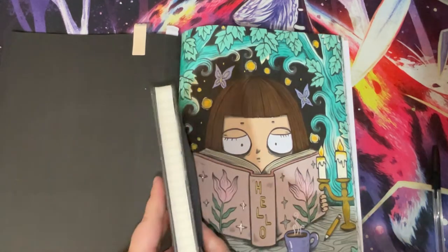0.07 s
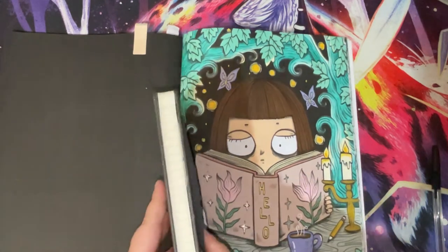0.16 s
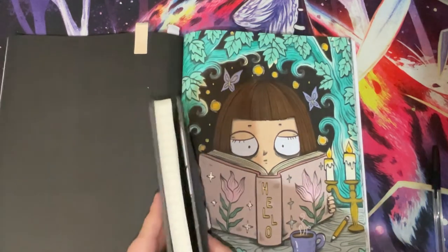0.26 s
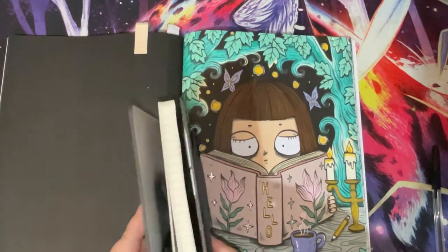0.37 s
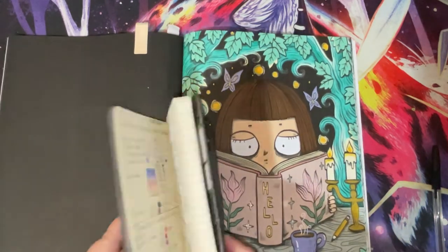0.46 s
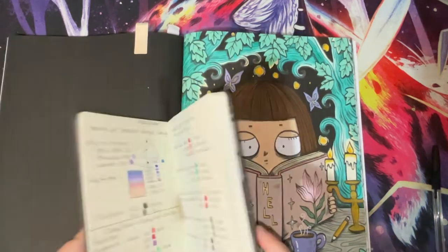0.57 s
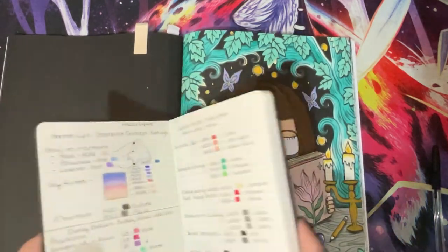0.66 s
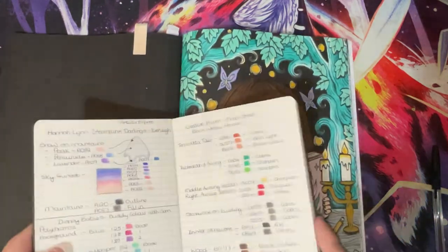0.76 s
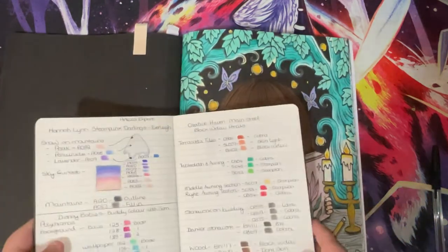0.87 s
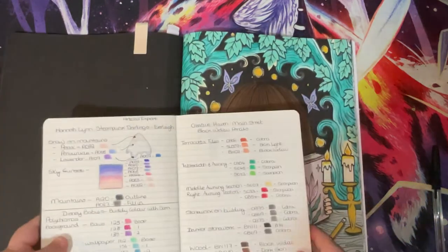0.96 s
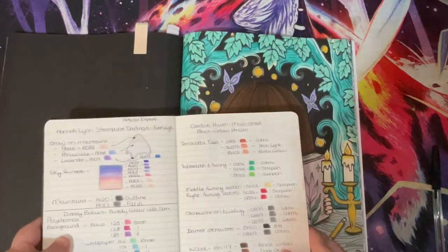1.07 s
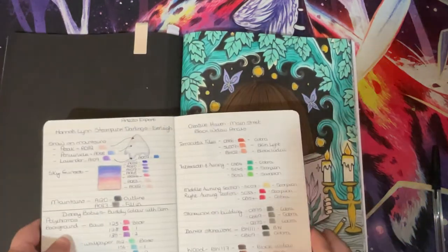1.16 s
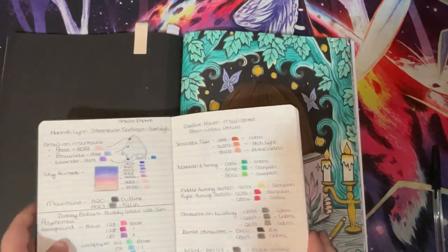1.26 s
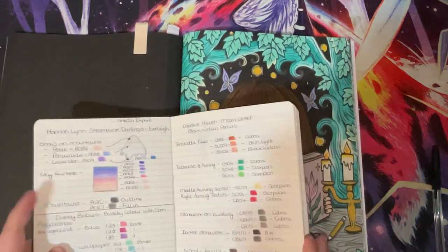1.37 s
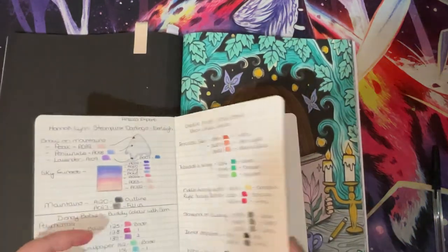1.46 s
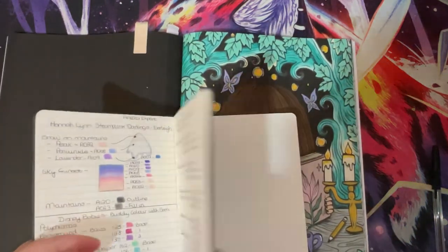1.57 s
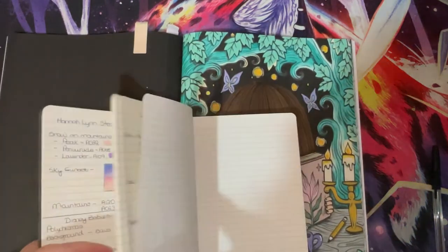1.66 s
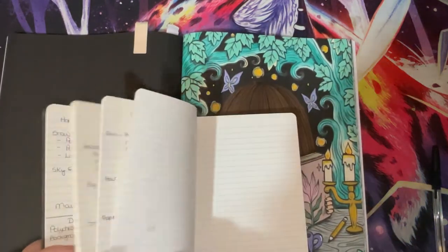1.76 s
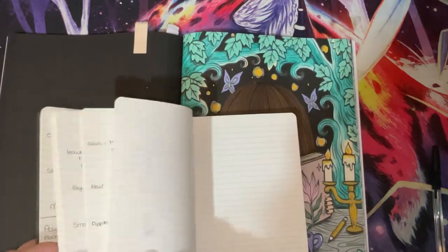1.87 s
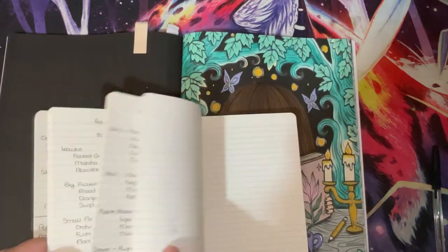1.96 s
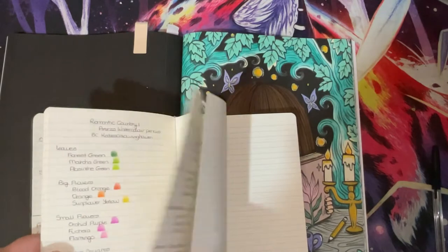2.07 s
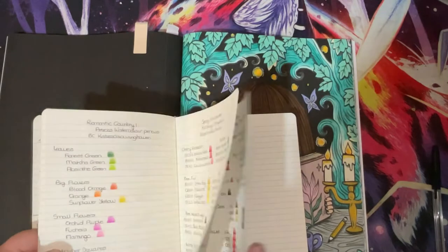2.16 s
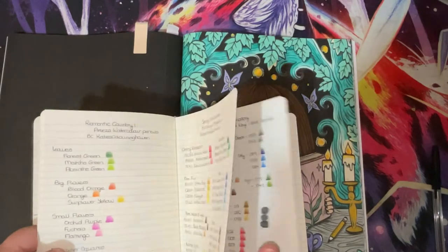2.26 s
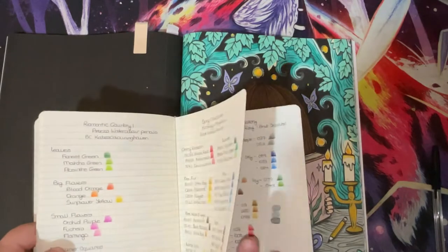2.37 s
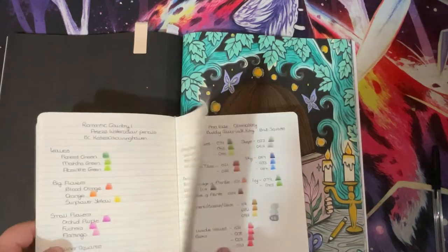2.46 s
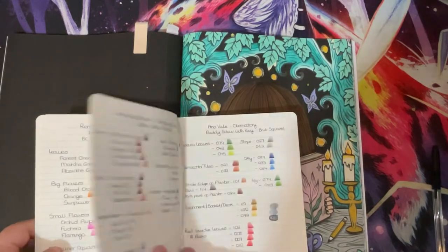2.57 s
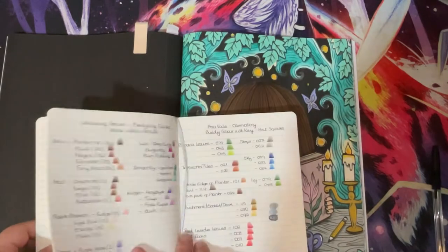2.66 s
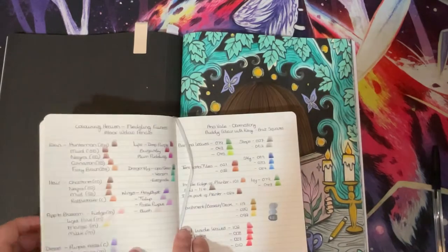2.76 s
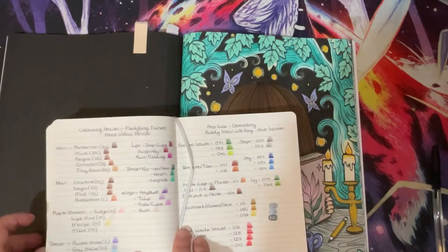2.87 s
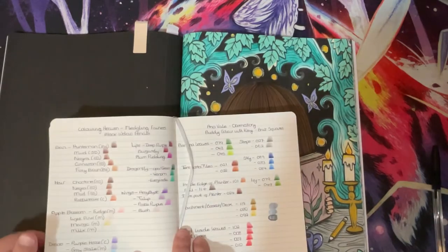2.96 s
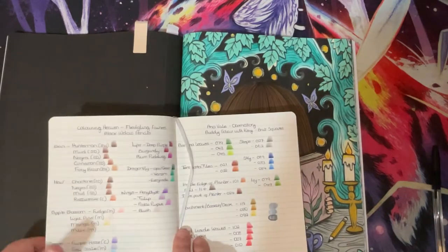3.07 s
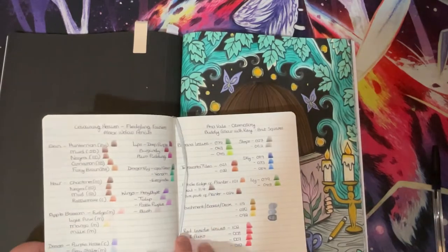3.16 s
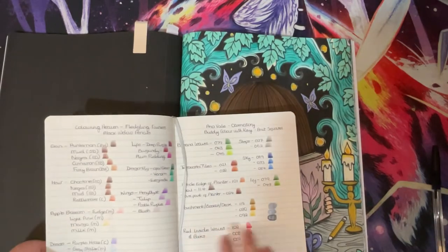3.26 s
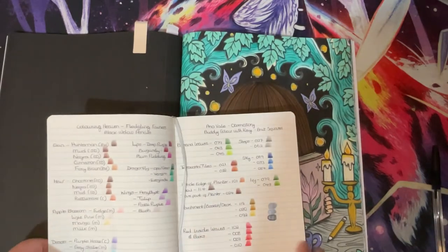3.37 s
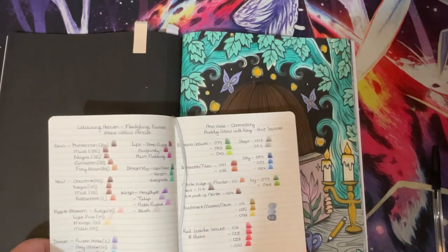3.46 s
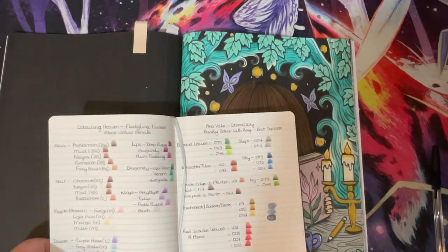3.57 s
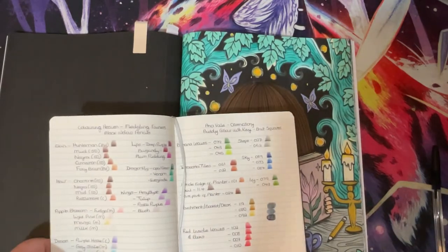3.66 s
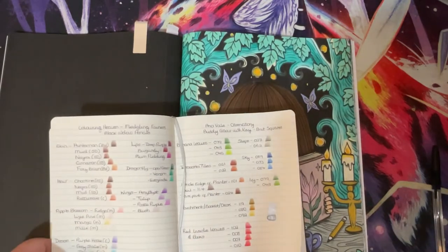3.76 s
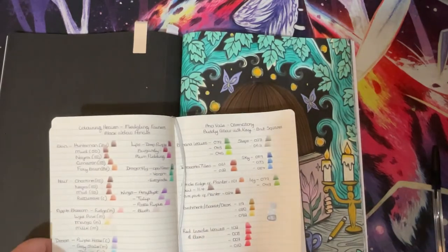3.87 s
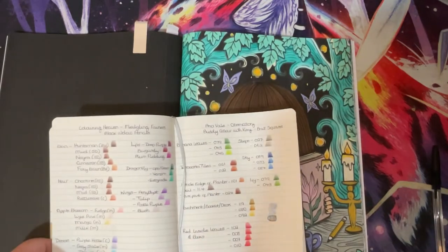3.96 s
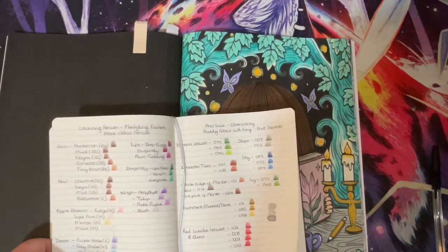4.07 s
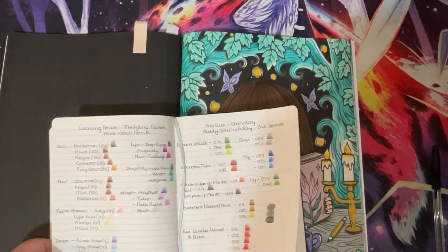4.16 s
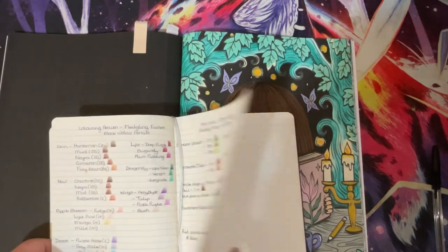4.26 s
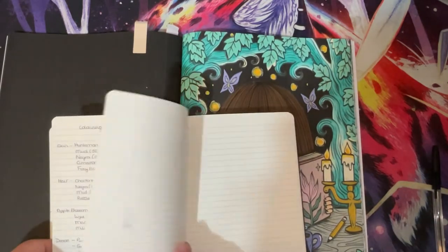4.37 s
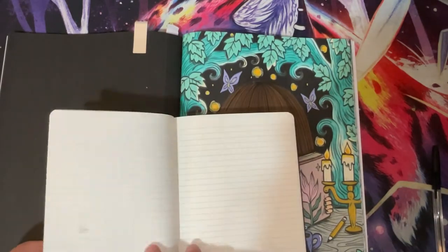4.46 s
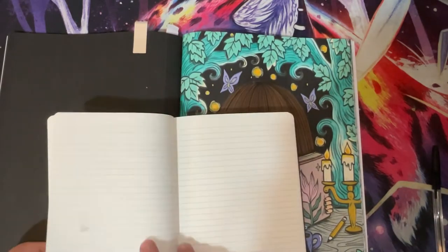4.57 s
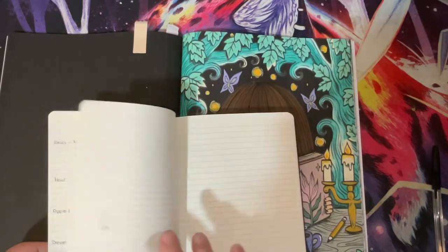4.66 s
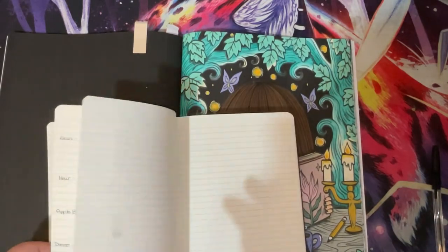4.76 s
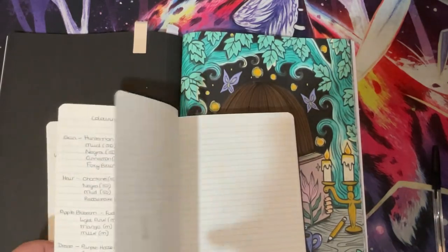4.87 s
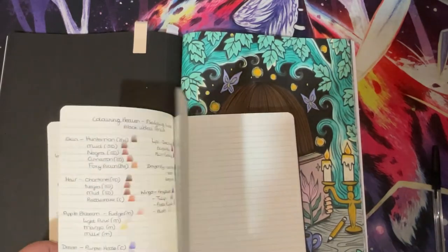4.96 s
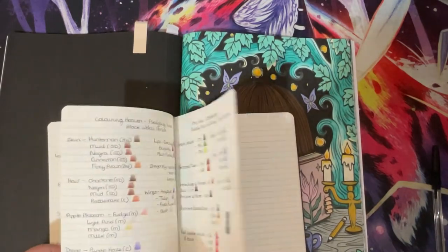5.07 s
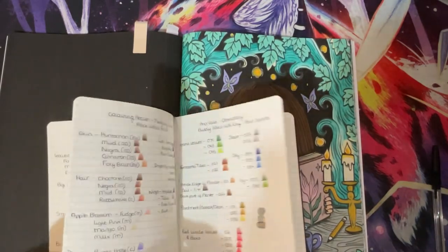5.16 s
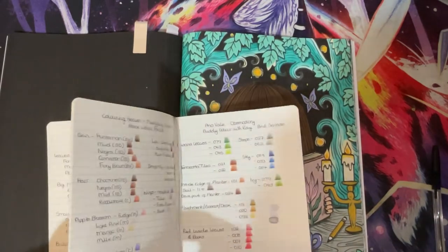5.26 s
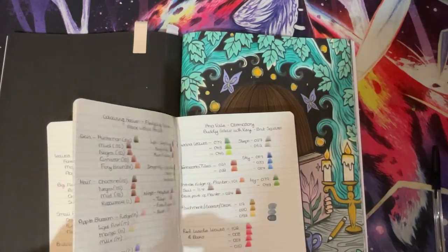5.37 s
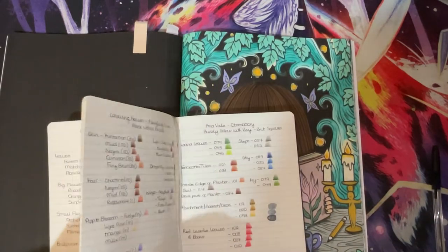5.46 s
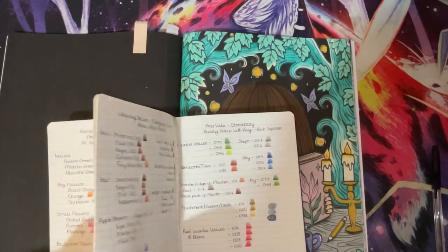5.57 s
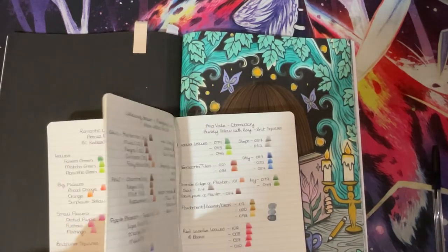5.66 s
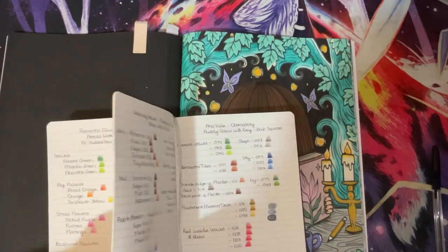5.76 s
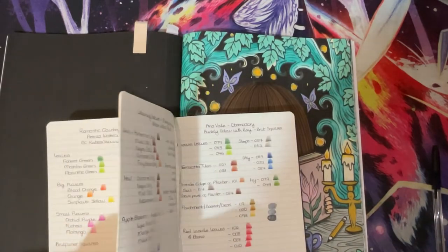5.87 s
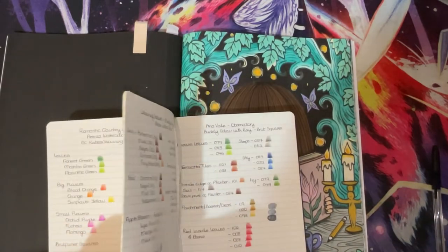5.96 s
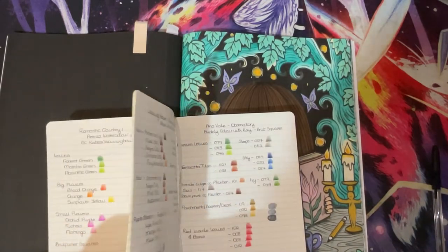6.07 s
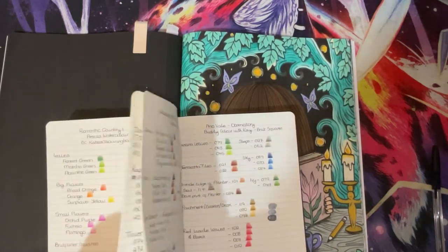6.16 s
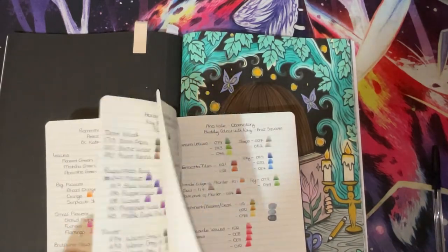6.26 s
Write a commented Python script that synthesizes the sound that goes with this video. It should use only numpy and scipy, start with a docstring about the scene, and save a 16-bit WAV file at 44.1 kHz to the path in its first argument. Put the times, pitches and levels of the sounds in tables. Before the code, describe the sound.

Close to a stereo microphone in a quiet, humming room, a small notebook opens with a burst of sharp dry snaps and spine crackle. Its cover lands with one dull thud on the desk, then pages slide and flap over. After a near-still pause, fingertips tap and swipe, more sheets flip with hollow puffs, and lighter leafing ends in a swelling hiss.

```python
"""At a desk in a quiet room, a small notebook is opened and leafed through close to two microphone ports.
Sliding sheets hiss by stick-slip friction, creases and the spine snap by buckling and fracture,
and flapping sheets, soft knocks and one thud of the cover are impacts that ring the book or the desk.
Ventilation drones throughout: a steady hum with noise shaped by resonances."""
import sys
import numpy as np
from scipy import signal
from scipy.fft import rfft, irfft, next_fast_len
from scipy.io import wavfile
from scipy.ndimage import uniform_filter1d, map_coordinates

SR = 44100
rng = np.random.default_rng(int(sys.argv[2]) if len(sys.argv) > 2 else 0)


def log_audio(samples):
    """Write samples as a 16-bit WAV file to the path given in sys.argv[1]."""
    # one column per channel
    frames = np.atleast_2d(samples).T
    # limit to full scale, then quantise
    limited = np.clip(frames, -1, 1)
    pcm = np.round(limited * 32767).astype(np.int16)
    wavfile.write(sys.argv[1], SR, pcm)


N = 277809


def amp(db):
    """Decibels to amplitude ratio."""
    return 10 ** (np.asarray(db) / 20)


def unit(x):
    """Normalisation to rms 1."""
    return x / np.sqrt(np.mean(x ** 2) + 1e-20)


def along(points, hz):
    """Interpolation of (Hz, value) points on a logarithmic frequency axis."""
    f, v = np.transpose(points)
    return np.interp(np.log(hz + 1), np.log(f + 1), v)


def filtered(x, response):
    """Linear filtering: the spectrum of x times a complex response of frequency."""
    n = x.shape[-1]
    m = next_fast_len(n + 8192)
    return irfft(rfft(x, m) * response(np.fft.rfftfreq(m, 1 / SR)), m)[..., :n]


def coloured(x, spectrum):
    """Spectral shaping of x, returned at rms 1."""
    return unit(filtered(x, lambda hz: amp(along(spectrum, hz))))


def resonance(hz, centre, width):
    """Damped oscillator: the causal response of one mode."""
    return 1j * hz * width / (centre ** 2 - hz ** 2 + 1j * hz * width)


def decay(t, t60):
    """Exponential decay: a fall of 60 dB in t60 seconds."""
    return np.exp(-np.log(1000) * t / t60)


def wobble(rate):
    """Slow random modulation: a smooth curve with rate knots a second."""
    knots = rng.standard_normal(int(N * rate / SR) + 4)
    return map_coordinates(knots, [np.arange(N) * rate / SR])


def swells(rows):
    """Superposition of bell-shaped level curves."""
    t = np.arange(N) / SR
    return sum(amp(db) * np.exp(-((t - s) / length) ** 2) for s, db, length in rows)


def add(track, s, sound):
    """Superposition: mixes a sound in at time s."""
    part = track[round(s * SR):][:len(sound)]
    part += sound[:len(part)]


# spectrum of the air rush: pitch_hz, level_db
AIR_SPECTRUM = [(20, -59), (35, -27.5), (60, -11), (90, -6.5), (150, 2), (280, -1.5), (420, -10),
                (600, -7.5), (800, -18), (1300, -19.5), (2600, -32.5), (6000, -39.5), (9800, -58.5),
                (12500, -42.5), (16000, -45)]
# droning room resonances: pitch_hz, width_hz (of each of two passes), level_db (rms)
DRONE_MODES = [(63.3, 16, -64.5), (119.4, 31, -63.5), (151.4, 38.5, -59.5), (247.3, 32.7, -59),
               (303.7, 14, -68), (547.2, 16, -68)]


def ventilation(air_db=-59, side_db=-16, hum_hz=60, hum_db=-62.5, drift=0.2):
    """Mains hum and resonance: hum, soft rush and droning modes, nearly the same at both ports."""
    mid, side = amp(air_db) * coloured(rng.standard_normal((2, N)), AIR_SPECTRUM)
    for hz, width, db in DRONE_MODES:
        drone = filtered(rng.standard_normal(N), lambda f: resonance(f, hz, width) ** 2)
        mid = mid + amp(db) * unit(drone)
    phase = 2 * np.pi * hum_hz * np.arange(N) / SR + drift * wobble(2.1)  # drift in radians
    hum = unit(np.sin(phase))
    return mid + amp(hum_db) * hum + amp(side_db) * np.array([side, -side])


GLIDE_DB, GLIDE_FIZZ_DB = 2, 0.5  # gains on the hiss and the fizz columns
GLIDE_FADE_S = 0.18  # fade at both ends of a spell
# murmur level at one hiss level (after its gain), and its dB per dB of hiss
MURMUR_DB, MURMUR_AT_DB, MURMUR_GROWS = -57.5, -54.5, 0.6
# sheets gliding over each other, one curve per spell of leafing:
# time_s, hiss_db, fizz_db (both before the gains above)
GLIDE_SPELLS = [
    [(0.0, -57, -88.5), (0.266, -62, -62.5), (0.41, -64.5, -65.5), (0.552, -59, -60.5), (0.886, -60, -65),
     (1.022, -67, -73), (1.075, -67, -88), (1.12, -80.5, -94), (1.22, -81, -95), (1.324, -87, -90),
     (1.39, -69, -95)],
    [(1.47, -64.5, -75), (1.62, -55, -69), (2.06, -56.5, -58), (2.228, -62, -62.5), (2.652, -66.5, -69),
     (2.754, -57.5, -62.5), (2.878, -67, -71), (2.96, -92, -99), (3.044, -67, -87), (3.24, -78.5, -86),
     (3.33, -86.5, -93.5)],
    [(4.03, -67, -85), (4.134, -61.5, -65), (4.3, -61.5, -71.5), (4.46, -60, -62), (4.56, -58.5, -63),
     (4.7, -68.5, -78.5), (4.78, -74.5, -86), (4.856, -74, -92), (5.15, -61.5, -69), (5.29, -69.5, -81),
     (5.37, -64, -66.5), (5.44, -70.5, -83.5), (5.5, -63.5, -62), (5.56, -69.5, -88), (5.583, -79, -95.5),
     (5.61, -70.5, -90), (5.68, -96, -92)],
    [(6.02, -78, -88), (6.066, -66, -79), (6.206, -53, -62.5), (6.244, -47.5, -61), (6.3, -47, -55)],
]


def glide():
    """Sliding friction: slow hiss, murmur and fizz levels; the harder the slide, the more murmur."""
    t, levels = np.arange(N) / SR, np.zeros((3, N))
    for spell in GLIDE_SPELLS:
        s, hiss_db, fizz_db = np.transpose(spell)
        hiss_db = np.interp(t, s, hiss_db) + GLIDE_DB
        fizz_db = np.interp(t, s, fizz_db) + GLIDE_FIZZ_DB
        murmur_db = MURMUR_DB + MURMUR_GROWS * (hiss_db - MURMUR_AT_DB)
        touching = np.clip(1 + np.minimum(t - s[0], s[-1] - t) / GLIDE_FADE_S, 0, 1)
        levels += touching * amp([hiss_db, murmur_db, fizz_db])
    return levels


def friction(spectrum, rate, share, flutter_db):
    """Stick-slip: fibres catch and let go, tiny slips on a fine rush under uneven pressure."""
    rush = rng.standard_normal(N)
    slips = (rng.random(N) < rate / SR) * rng.standard_normal(N)  # rate in slips a second
    share = np.clip(share, 0, 1)  # share of the power in the slips
    grains = np.sqrt(1 - share) * rush + np.sqrt(share) * unit(slips)
    pressure = amp(flutter_db * wobble(70))
    return unit(coloured(grains, spectrum) * pressure)


# spectrum of paper rubbing on paper: pitch_hz, level_db
HISS_SPECTRUM = [(300, -4.5), (1200, -16), (2600, 1), (3700, -1), (5000, 2), (7000, 3.5), (9500, -9),
                 (12000, -4), (15500, -34)]
# spectrum of its top treble: pitch_hz, level_db
FIZZ_SPECTRUM = [(5000, -25), (9500, -29.5), (12500, 3), (15500, -2)]
# spectrum radiated by a bent sheet: pitch_hz, level_db
SHEET_SPECTRUM = [(100, 1), (300, 3.5), (550, 3.5), (850, -0.5), (1100, 5.5), (1400, 4.5), (1700, 1),
                  (2100, -3), (2700, -0.5), (4500, -25), (12000, -46)]


def sliding(hiss, murmur, fizz):
    """Friction and radiation: rubbing paper hisses and fizzes, the bent sheet murmurs lower."""
    grip = amp(1.3 * wobble(35))
    surfaces = hiss * friction(HISS_SPECTRUM, rate=1400, share=0.074, flutter_db=1.5)
    surfaces = surfaces + fizz * friction(FIZZ_SPECTRUM, rate=820, share=0.28, flutter_db=3.5)
    return grip * surfaces + murmur * friction(SHEET_SPECTRUM, rate=380, share=0.12, flutter_db=3.0)


def flexing(x, patchy_db=1.3):
    """Varying resonance: a sheet keeps changing its curve, so bands of its sound come and go."""
    z = signal.stft(x, nperseg=512)[2]
    over_pitch = uniform_filter1d(rng.standard_normal(z.shape), size=7, axis=0)
    field = uniform_filter1d(over_pitch, size=12, axis=1)
    return signal.istft(z * amp(patchy_db * unit(field)), nperseg=512)[1][:N]


def ticks(spectrum, rate):
    """Random impulses: scattered tiny contacts of random size, rate a second, at rms 1."""
    return coloured((rng.random(N) < rate / SR) * (rng.random(N) - .5), spectrum)


# spectrum of crisp paper contacts, also the scuff of flaps and taps: pitch_hz, level_db
CRISP_SPECTRUM = [(400, -15), (2000, 11), (5500, 2.5), (9000, 3), (15500, -9.5)]


def crinkles(hiss, murmur, crisp_db=-9, soft_db=-7):
    """Impulsive emission: a moving sheet ticks and pats, stronger while it slides hard."""
    crisp = amp(crisp_db) * hiss * ticks(CRISP_SPECTRUM, rate=70)
    soft = amp(soft_db) * murmur * ticks(SHEET_SPECTRUM, rate=45)
    return crisp + soft


# ringing modes of the block of pages: pitch_hz (before detuning), width_hz, level_db
BOOK_MODES = [(540, 51, -9), (688, 30, -9), (964, 41, -4.5), (1170, 21, -12.5), (1460, 24, -10.5),
              (1625, 40, -8.5)]


def book(x, detune=0.07):
    """Modal ringing: a blow and the ring of the pages, whose pitch differs with each grip."""
    shifts = np.exp(detune * rng.standard_normal(len(BOOK_MODES)))
    modes = [(hz * shift, width, db) for (hz, width, db), shift in zip(BOOK_MODES, shifts)]
    return filtered(x, lambda f: 1 + sum(amp(db) * resonance(f, hz, width) for hz, width, db in modes))


# the cover shifting on the book beneath: centre_s, level_db (rms at the centre), half_length_s
COVER_RUBS = [(.04, -54.5, 0.27), (.35, -53, 0.045), (.74, -54, 0.1), (1.01, -53.5, 0.13),
              (1.305, -46, 0.038), (2.252, -37.5, 0.015), (2.285, -48.5, 0.015), (2.475, -55, 0.077),
              (3.09, -53, 0.047), (4.74, -54.5, 0.075), (6.15, -49.5, 0.023)]
# spectrum of the cover's drag: pitch_hz, level_db
RUB_SPECTRUM = [(200, -6.5), (420, -4), (750, -6), (1050, -10), (1500, -29.5), (3000, -24), (8000, -69)]
# a bent sheet scraping along its neighbour: centre_s, level_db (rms at the centre), half_length_s
SHEET_SCRAPES = [(.369, -37.5, 0.0034), (2.185, -43, 0.017), (2.212, -36.5, 0.016), (2.235, -36.5, 0.0047),
                 (3.058, -50, 0.026), (4.495, -52, .018), (4.592, -43, 0.0071), (4.85, -52.5, 0.04),
                 (6.283, -44, 0.011)]
# spectrum of the hollow scrape: pitch_hz, level_db
SCRAPE_SPECTRUM = [(300, -29), (900, -11), (1200, 2), (1500, 1), (1800, -6), (2400, -15), (3200, -9.5),
                   (4500, -44.5), (12000, -61.5)]


def rubbing():
    """Friction driving resonance: the stiff cover drags dully and rings the book, sheets scrape higher."""
    grain = friction(RUB_SPECTRUM, rate=600, share=0.96, flutter_db=2.0)
    grip = np.sin(np.pi * wobble(2)) ** 2
    # the ring wanders between two tunings of the book
    drag = unit(grip * book(grain) + (1 - grip) * book(grain))
    scrape = friction(SCRAPE_SPECTRUM, rate=460, share=0.406, flutter_db=4)
    return swells(COVER_RUBS) * drag + swells(SHEET_SCRAPES) * scrape


# air pushed ahead of the swinging sheets: centre_s, level_db (rms at the centre), half_length_s
AIR_WAFTS = [(.25, -55.5, 0.4), (1.6, -56, 0.12), (2.244, -51, 0.045), (4.43, -48.5, 0.056),
             (6.238, -56.5, 0.14)]
# spectrum of the rumble: pitch_hz, level_db
WAFT_SPECTRUM = [(15, -65), (30, -24.5), (45, -18.5), (62, 13), (95, 0), (160, -1), (400, -38), (1500, -66)]


def wafts():
    """Air flow: swinging sheets fan a soft rumble at the microphone."""
    return swells(AIR_WAFTS) * coloured(rng.standard_normal(N), WAFT_SPECTRUM)


# a firm swipe's hiss level and rise; a swipe SOFTER_DB softer takes twice as long to rise
FIRM_DB, SWIPE_ATTACK_S, SOFTER_DB = -39.5, 0.0079, 10
SWIPE_SAG_DB_PER_S, SWIPE_RELEASE_S = 21, 0.1  # steady loss; t60 added once it lets go
# quick swipes of a finger or a page edge:
# start_s, length_s (before release), hiss_db, murmur_db (over the hiss), fizz_db (over the hiss)
QUICK_SWIPES = [(0.344, 0.011, -48, 7, -1), (0.625, 0.092, -51, -13, -5.5), (0.952, 0.065, -55, 0, -6),
                (1.268, 0.035, -59.5, 7, -8.5), (1.318, 0.039, -69, -2, -19),
                (1.395, 0.012, -49.5, 10.5, -5), (1.479, .11, -47, 1, -10.5),
                (1.707, 0.043, -47, -9.5, -14), (1.806, 0.047, -50.5, -4, -5), (2.137, 0.08, -46.5, 0.5, 0),
                (2.404, 0.067, -58, -22, 3), (2.558, 0.11, -54.5, -5, -4.5), (2.853, 0.044, -56.5, 4.5, -3),
                (3.03, 0.13, -58.5, -0.5, 0), (3.164, 0.12, -69.5, -14, -14), (3.461, 0.071, -71, 2, -22),
                (3.686, 0.042, -51, -6, -15), (3.764, 0.011, -47.5, -7, -28.5),
                (3.826, 0.069, -43.5, -8, -15.5), (3.917, 0.055, -53.5, 8, -12),
                (4.032, 0.15, -46.5, -7.5, -2.5), (4.347, 0.028, -42.5, 1.5, -9),
                (4.363, .018, -41.5, -7, -6.5), (4.399, 0.062, -52.5, 11.5, -16.5),
                (4.569, 0.071, -45, -1.5, -6.5), (4.798, 0.075, -57.5, 4.5, -11),
                (5.061, 0.073, -56.5, -4.5, -1), (5.792, 0.025, -65.5, 10.5, -15),
                (5.97, 0.061, -56, 1.5, -15), (6.104, 0.071, -46.5, -7, -4.5), (6.125, 0.1, -50, -8, 0.5),
                (6.257, 0.018, -43.5, 0, -16.5)]


def swipes():
    """Transient friction: hiss, murmur and fizz levels that grip (louder is quicker), sag and let go."""
    t, levels = np.arange(SR // 2) / SR, np.zeros((3, N))
    for s, length, db, murmur_db, fizz_db in QUICK_SWIPES:
        attack = SWIPE_ATTACK_S * 2 ** ((FIRM_DB - db) / SOFTER_DB)
        release = decay(np.maximum(t - length, 0), SWIPE_RELEASE_S)
        shape = np.minimum(t / attack, 1) * amp(-SWIPE_SAG_DB_PER_S * t) * release
        for track, over_db in zip(levels, (0, murmur_db, fizz_db)):
            add(track, s, amp(db + over_db) * shape)
    return levels


# dry snaps of the spine and the page edges:
# start_s, level_db (before the common gain), pitch_hz (centre), treble_db (top treble)
DRY_SNAPS = [(0.365, -34.5, 4560, -6.5), (0.4053, -28, 4650, -2), (.438, -31, 3800, -15),
             (0.4777, -27.5, 6800, -8), (0.4863, -34.5, 6000, -9), (0.4972, -26.5, 6120, -4.5),
             (0.502, -32.5, 5790, -9), (0.533, -17, 5640, -19), (.54, -31, 5000, -14),
             (0.5459, -12, 4370, -31), (.553, -23.5, 5200, -16), (0.5657, -22, 4700, -13.5),
             (.5768, -26, 4500, -13), (0.5782, -14, 3980, -15.5), (.5815, -27, 5600, -13),
             (.5877, -29, 6000, -11), (0.5957, -22.5, 4930, -12), (0.596, -20.5, 5300, -12),
             (0.5993, -22, 3290, -9), (0.605, -29, 3206, -11), (0.6065, -28, 3200, -10.5),
             (0.6387, -26.5, 3460, -12.5), (0.6426, -18.5, 3500, -10), (0.71, -29.5, 6470, -7.5),
             (0.87, -25.5, 7040, 4), (0.911, -34, 6560, -13), (1.306, -37.5, 5900, -1),
             (1.5798, -27, 3920, -18.5), (2.025, -29.5, 4620, -7), (2.1996, -27.5, 3600, -6),
             (2.2211, -27.5, 5480, -3), (2.239, -29, 7200, -3.5), (2.4088, -27, 5100, -7),
             (2.649, -33, 5060, -2.5), (2.726, -29, 3150, 0), (2.78, -35.5, 4630, 1),
             (4.1378, -17, 2360, -18.5), (4.1456, -28.5, 3570, -12.5), (4.2222, -35, 6500, 9.5),
             (4.6413, -26, 3120, -18), (5.9917, -22.5, 5290, -10), (6.0076, -17, 5420, -8.5)]


def snaps(width=0.35, ring_db=-6, ring_width=0.5, level_db=-3,
          shiver_db=-22, shiver_t60=0.016, tail_db=-37, tail_t60=0.031):
    """Buckling: a crease gives in one jerk and the sheet shivers briefly around its own pitch."""
    out, t = np.zeros(N), np.arange(SR // 16) / SR
    shiver = amp(shiver_db) * decay(t, shiver_t60) + amp(tail_db) * decay(t, tail_t60)
    for s, db, hz, top_db in DRY_SNAPS:
        buckle = rng.standard_normal(len(t)) * shiver
        buckle[0] = 1  # the jerk itself

        def crease(f):
            sharp = resonance(f, hz, width * hz) * resonance(f, hz, 2 * hz)
            ring = amp(ring_db) * resonance(f, hz, ring_width * hz)
            return sharp + ring - amp(top_db) * resonance(f, 12000, 7000)

        snap = filtered(buckle, crease)
        add(out, s, amp(db + level_db) * snap / np.linalg.norm(snap) * np.sqrt(SR / 2500))
    return out


# sheets flapping down: start_s, level_db (before the common gain), pitch_hz (before the sag),
# t60_s, crispness_db (over the puff), edge_hz (upper edge)
SHEET_FLAPS = [(0.3661, -19, 1390, 0.0082, -16.5, 3400), (.578, -29, 1600, 0.01, -14, 3200),
               (.599, -31, 1400, 0.014, -14, 3200), (0.6416, -28, 1500, 0.014, -20.5, 2500),
               (0.6641, -29, 830, 0.08, -4.5, 1690), (1.576, -29.5, 750, 0.027, -12.5, 2400),
               (1.862, -40, 850, 0.062, -9, 2000), (2.0165, -35.5, 1390, 0.045, -5, 2600),
               (2.023, -33.5, 1290, 0.067, -5, 2600), (2.0655, -37, 1210, 0.065, 4, 2600),
               (2.1445, -34, 1400, 0.039, -1.5, 2600), (2.2262, -18.5, 1280, 0.088, -43, 2580),
               (2.2417, -20, 1040, 0.059, -40, 1900), (2.278, -34, 1000, 0.081, -30, 2000),
               (2.384, -39, 800, 0.043, -14, 2000), (2.45, -32.5, 910, 0.017, -20, 1590),
               (2.489, -34.5, 650, 0.077, -28, 1490), (2.561, -39, 1440, 0.023, -18, 2400),
               (2.884, -38, 1640, .02, -10, 3000), (2.901, -39, 1550, .035, -12, 3000),
               (3.055, -34.5, 1900, 0.025, -4, 3800), (3.072, -35, 1400, 0.025, -23, 3400),
               (3.113, -33, 1120, .024, -24, 2800), (3.133, -38, 1500, .015, -18, 2600),
               (3.831, -41.5, 1300, 0.036, 5.5, 2800), (4.1362, -19.5, 1570, 0.02, -4.5, 2850),
               (4.1447, -20.5, 1170, 0.02, -14, 2850), (4.4115, -16.5, 1560, 0.023, -27.5, 2150),
               (4.437, -19.5, 1500, 0.022, -17, 3200), (4.4412, -15.5, 1550, 0.033, -25.5, 3000),
               (4.4495, -21, 1300, 0.031, -28, 2800), (4.4747, -17.5, 1630, 0.037, -32, 2660),
               (4.596, -36, 1000, 0.04, -15, 2180), (4.6055, -25.5, 1490, 0.024, -20, 2100),
               (4.6385, -24.5, 1680, 0.043, -27, 3240), (4.709, -30.5, 1190, 0.035, -34, 1670),
               (4.736, -32.5, 1340, 0.022, -36, 1680), (5.124, -22.5, 1190, 0.015, -28.5, 2200),
               (5.7935, -40, 900, 0.037, -4, 2400), (5.9353, -40, 900, 0.078, -7, 2400),
               (6.0063, -20, 1580, 0.017, -25.5, 2400), (6.173, -24.5, 1320, 0.03, -21, 2040)]


def flaps(width=0.61, rise=0.001, knock=0.73, knock_t60=0.027, body_db=-13, body_hz=380,
          sag_s=0.017, sag_ratio=0.78, level_db=-5):
    """Impact on an air pocket: a knock, a hollow puff sinking as the sheet lies down, a crisp scuff."""
    out, t = np.zeros(N), np.arange(SR // 6) / SR
    raised = np.exp(-(t / sag_s) ** 2)
    for s, db, hz, t60, crisp_db, edge_hz in SHEET_FLAPS:
        air, scuff = rng.standard_normal((2, len(t)))
        stroke = (1 - np.exp(-t / rise)) * decay(t, t60)
        blow = air * stroke / np.linalg.norm(stroke)
        # short contacts are mostly one knock, 1 ms in
        blow[SR // 1000] += knock * min(knock_t60 / t60, 1.5) ** 2

        def pocket(f, at):
            body = amp(body_db) * resonance(f, body_hz, body_hz)
            return (resonance(f, at, width * at) - body) / (1 + (f / edge_hz) ** 8)

        puff = filtered(blow * raised, lambda f: pocket(f, hz))
        puff = puff + filtered(blow * (1 - raised), lambda f: pocket(f, sag_ratio * hz))
        sound = unit(book(puff)) + amp(crisp_db) * coloured(scuff * stroke, CRISP_SPECTRUM)
        add(out, s, amp(db + level_db) * np.sqrt(np.mean(stroke ** 2)) * sound)
    return out


# soft knocks of fingertips, page corners and the spine: start_s, level_db (before the common gain),
# pitch_hz (after the drop), rise_s, scuff_db (over the knock, before halving)
SOFT_TAPS = [(.3672, -32.5, 714, .0013, -12), (.562, -40, 58, 0.015, -45), (0.6648, -31, 777, 0.0017, -14),
             (0.72, -45, 686, .002, -16.5), (.737, -48, 745, 0.0037, -20),
             (1.049, -40.5, 910, 0.00078, -14), (2.2212, -23.5, 523, 0.0013, -25),
             (2.2575, -35, 452, 0.003, -30), (3.077, -41, 383, 0.0011, -20),
             (3.1137, -37.5, 360, 0.0016, -21.5), (3.936, -32, 590, 0.0011, 6),
             (3.9699, -29.5, 505, 0.0015, 2), (4.0083, -30.5, 825, 0.0015, -3),
             (4.0342, -37.5, 650, 0.0016, 6), (4.0785, -40.5, 800, .001, 2.5),
             (4.0857, -36.5, 744, 0.0014, 0.5), (4.136, -23.5, 876, 0.0015, -18),
             (4.349, -36.5, 453, 0.0023, -4), (4.419, -27.5, 622, 0.0022, -25),
             (4.4675, -33, 676, 0.0028, -20), (4.7052, -39.5, 380, 0.0018, -28),
             (4.752, -41, 770, 0.0017, -28), (5.1245, -38, 410, 0.0014, -19),
             (5.7942, -43, 400, 0.0017, -7), (5.9365, -42, 400, 0.0019, -13.5),
             (6.1745, -36.5, 450, 0.00098, -20)]


def taps(bend=1.55, bend_s=0.00098, scuff_t60=0.028, level_db=-2.5):
    """Spreading contact: a soft knock drops quickly in pitch as it lands; paper scuffs under it."""
    knocks, scuffs, t = np.zeros(N), np.zeros(N), np.arange(SR // 8) / SR
    for s, db, hz, rise, scuff_db in SOFT_TAPS:
        cycles = hz * (t + bend * bend_s * (1 - np.exp(-t / bend_s)))
        swing = t / rise * np.exp(1 - t / rise) * np.sin(2 * np.pi * cycles)
        add(knocks, s, amp(db) * book(swing))
        scuff = coloured(rng.standard_normal(len(t)), CRISP_SPECTRUM)
        add(scuffs, s, .5 * amp(db + scuff_db) * decay(t, scuff_t60) * scuff)
    return amp(level_db) * (knocks + scuffs)


# glue and thread crackling as the spine bends: centre_s, level_db (rms at the centre), half_length_s
SPINE_BURSTS = [(.369, -38, 0.0034), (.497, -57.5, 0.0099), (.544, -48, 0.0072), (.58, -43.5, 0.0053),
                (.6, -39, 0.012), (.643, -43.5, 0.0045)]
# spectrum of the crackle: pitch_hz, level_db
CRACKLE_SPECTRUM = [(400, -22), (1200, -14), (2500, -5.5), (4500, -12), (7000, -6), (10000, -10),
                    (15500, -19)]


def spine():
    """Micro-fracture: a dense spray of tiny breaks surrounds the big snaps of the opening cover."""
    return swells(SPINE_BURSTS) * friction(CRACKLE_SPECTRUM, rate=900, share=0.78, flutter_db=5.5)


def push(db, hz, cycles):
    """Heavily damped oscillation: a swing whose envelope peaks after the given cycles."""
    t = np.arange(SR // 8) / SR
    age = t * hz / cycles
    return amp(db) * age * np.exp(1 - age) * np.sin(2 * np.pi * hz * t)


# the cover lands edge first, then with more and more of its face; the pages sink after it:
# start_s, level_db (envelope peak before the ring), pitch_hz, cycles (to the peak)
COVER_LANDING = [(1.4002, -14.5, 560, 0.73), (1.408, -19.6, 417, 0.56), (1.4136, -16, 313, 0.39),
                 (1.4214, -19.5, 209, 0.18), (1.457, -41.5, 106, .9), (1.474, -40.5, 229, 0.81)]
# book and desk ring on afterwards: pitch_hz, width_hz, level_db (before softening)
DESK_MODES = [(130, 43, 9), (230, 15, 1), (329, 24, -3), (506, 17, 0.5), (610, 16, -11), (932, 22, 25)]


def thud(soft_hz=1250):
    """Impact and modal ringing: damped pushes of the landing cover together ring board and desk."""
    pushes = np.zeros(N)
    for s, db, hz, cycles in COVER_LANDING:
        add(pushes, s, push(db, hz, cycles))

    def board(f):
        ring = sum(amp(db) * resonance(f, hz, width) for hz, width, db in DESK_MODES)
        return (1 + ring) / (1 + (f / soft_hz) ** 6)

    return filtered(pushes, board)


# phase by which the left port trails the right: pitch_hz, lag_rad
PORT_LAG = [(0, 0), (450, -.05), (750, -.6), (1000, -.85), (1500, .1), (2050, .8), (2350, 1.7), (2600, 3.1),
            (2900, 4.6), (3400, 5.7), (4000, 6.5), (5500, 7.2), (7500, 7.9), (9900, 9.45), (12300, 11),
            (14000, 12.2), (16000, 12.5)]


def ports(x):
    """Diffraction: sound from the desk bends round the housing and reaches the ports out of step."""
    f, lag = np.transpose(PORT_LAG)
    halves = np.array([[-1], [1]])
    return filtered(x, lambda hz: np.exp(.5j * np.interp(hz, f, lag) * halves))


def nearby(x, smallest_hz=550):
    """Scattering: desk top and arms throw short waves back within milliseconds; the bass passes by."""
    t = np.arange(SR // 30) / SR
    scatter = rng.standard_normal((2, len(t))) * (1 - np.exp(-t / .0006)) * decay(t, .028)
    short_waves = filtered(x, lambda f: f / np.hypot(f, smallest_hz))
    return signal.fftconvolve(short_waves[None], scatter / np.linalg.norm(scatter[0]), axes=1)[:, :N]


# reverberation of the room: pitch_hz, t60_s
ROOM_DECAY = [(150, 0.76), (1000, 0.24), (5000, 0.077), (15000, 0.024)]


def room(x):
    """Reverberation: a short diffuse answer of the walls, different at each port."""
    hz, t, z = signal.stft(rng.standard_normal((2, SR // 3)), SR, nperseg=256)
    tail = signal.istft(z * decay(t, along(ROOM_DECAY, hz)[:, None]), SR, nperseg=256)[1]
    tail = np.pad(tail / np.linalg.norm(tail[0]), ((0, 0), (SR // 250, 0)))  # starts 4 ms late
    return signal.fftconvolve(x[None], tail, axes=1)[:, :N]


RUSTLE_SCATTER_DB, COVER_SCATTER_DB = -6, -7  # share thrown back by the desk top and the arms
# where on the desk the sheets move: time_s, level_db (left minus right)
SHEET_PLACE = [(0, 0), (1.4, 0), (2, 0), (2.24, 1), (2.601, .5), (4.14, 0), (4.401, 0.7), (6.3, 0.5)]


def scene():
    """Superposition: the notebook close by, its faint echoes and the ventilation."""
    hiss, murmur, fizz = np.hypot(glide(), swipes())
    rustle = flexing(sliding(hiss, murmur, fizz)) + rubbing() + flaps() + taps()
    cover = thud()
    paper = rustle + snaps() + spine() + crinkles(hiss, murmur)
    # the scattering paths keep changing as the hands and sheets move
    turn = 2 * np.pi * wobble(2)
    thrown = amp(RUSTLE_SCATTER_DB) * rustle + amp(COVER_SCATTER_DB) * cover
    scattered = np.cos(turn) * nearby(thrown) + np.sin(turn) * nearby(thrown)
    lean_db = np.interp(np.arange(N) / SR, *np.transpose(SHEET_PLACE)) * np.array([[.5], [-.5]])
    close = amp(lean_db) * (ports(paper + cover) + scattered)
    echoes = room(amp(-13.5) * paper + amp(-29.0) * cover)
    return close + echoes + wafts() + ventilation()


TOP_HZ = 16000  # band limit
# balance of the two ports: pitch_hz, level_db (left minus right)
PORT_BALANCE = [(60, 1), (250, 1.3), (600, .5), (1100, 1.6), (2200, .7), (4500, -.7), (8000, 0)]


def record(dry, low_cut_hz=38):
    """Band limiting: the deepest bass is cut, the ports differ slightly in tone, the top ends sharply."""
    low_cut = signal.butter(2, low_cut_hz, 'highpass', fs=SR, output='sos')
    thin = signal.sosfilt(low_cut, dry)
    halves = np.array([[.5], [-.5]])
    return filtered(thin, lambda hz: amp(along(PORT_BALANCE, hz) * halves) * (hz < TOP_HZ))


dry = scene()
out = record(dry)
log_audio(out)
```